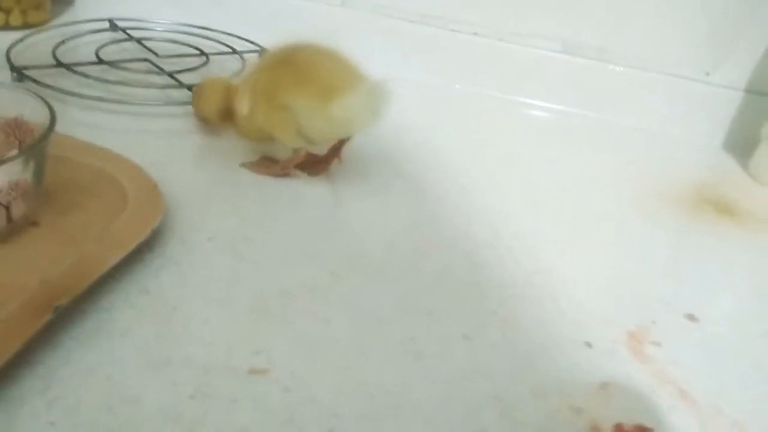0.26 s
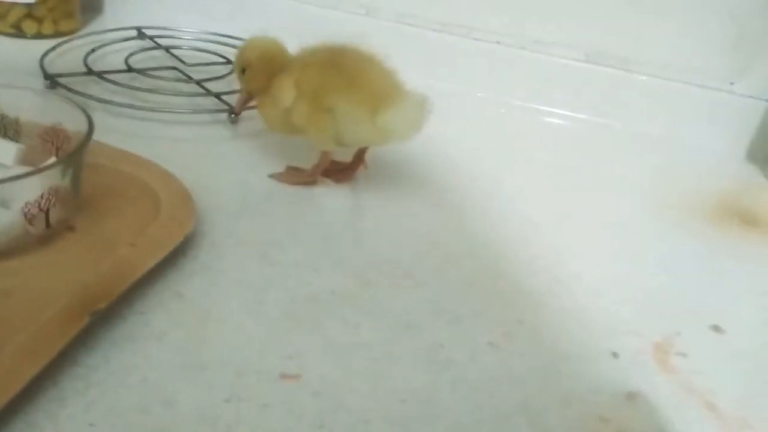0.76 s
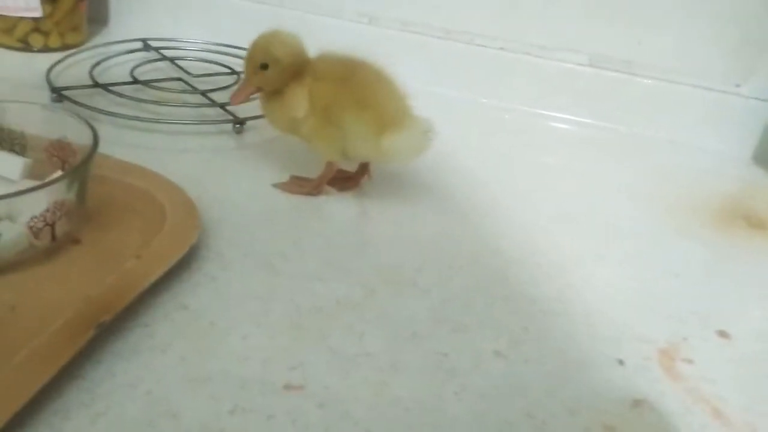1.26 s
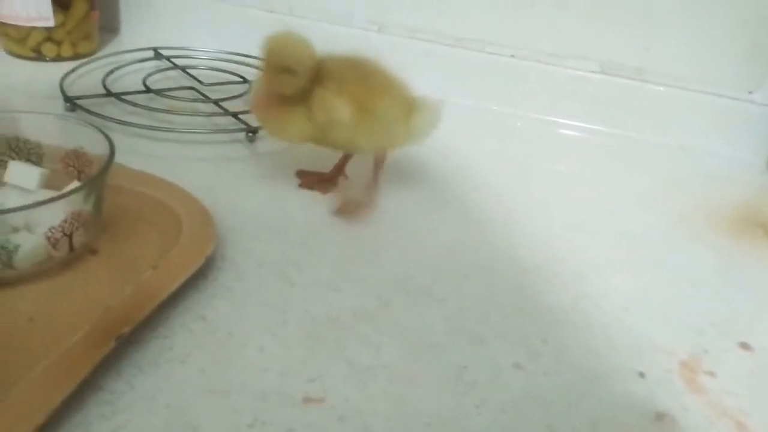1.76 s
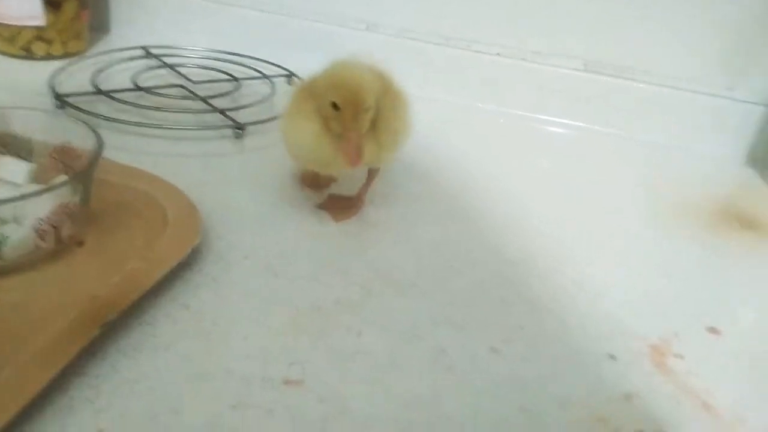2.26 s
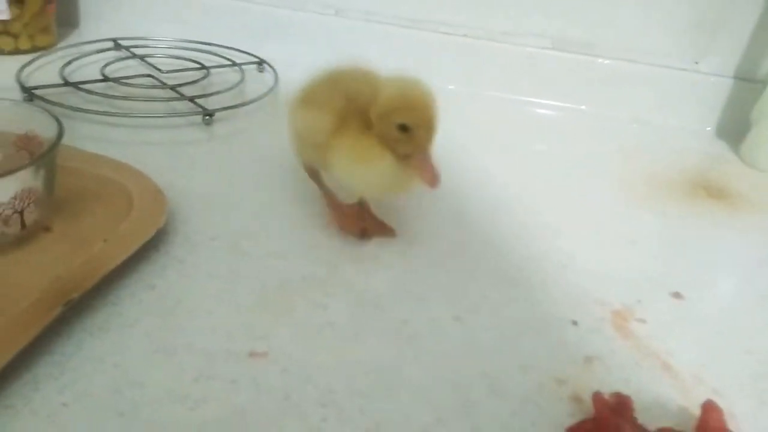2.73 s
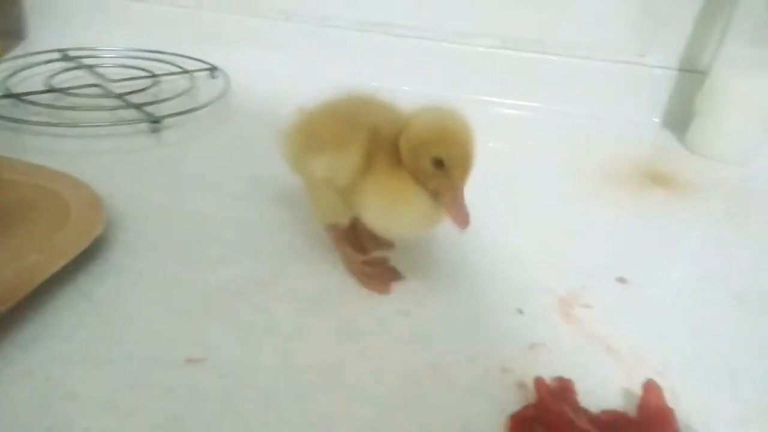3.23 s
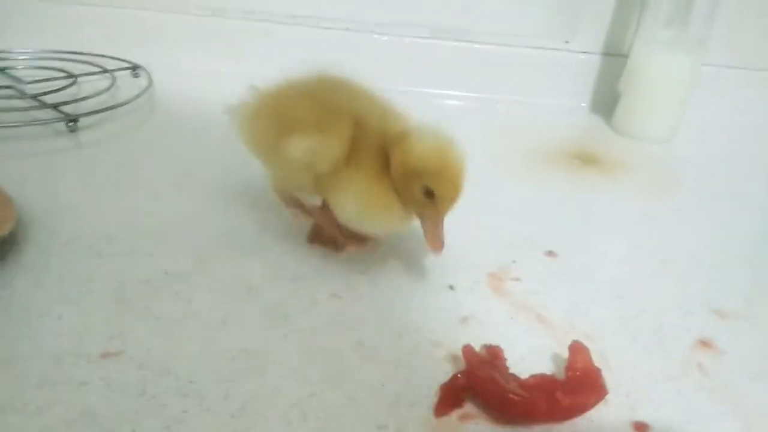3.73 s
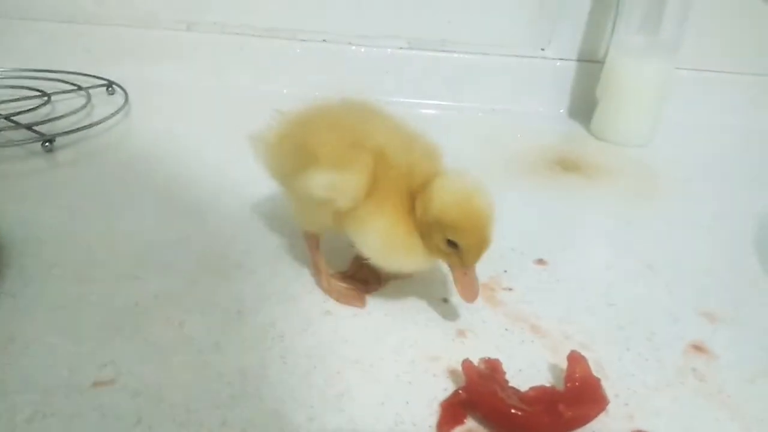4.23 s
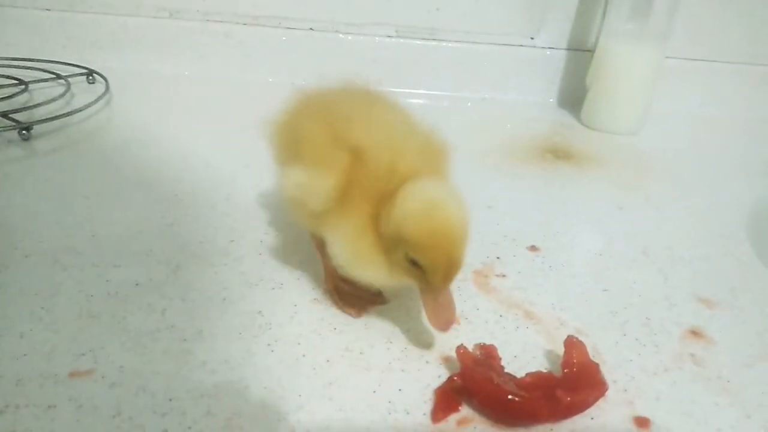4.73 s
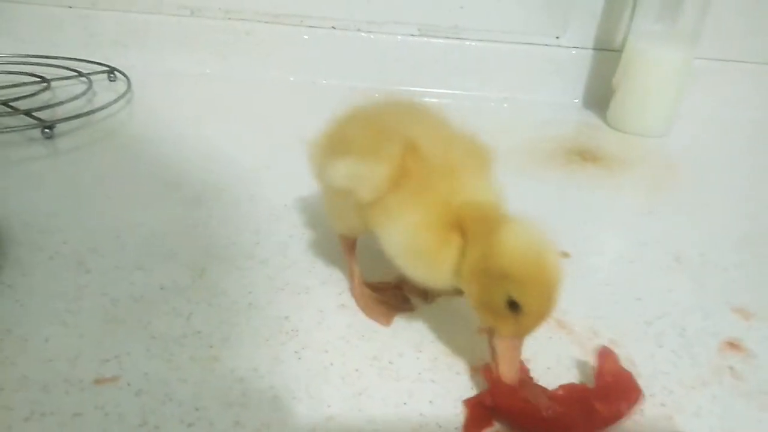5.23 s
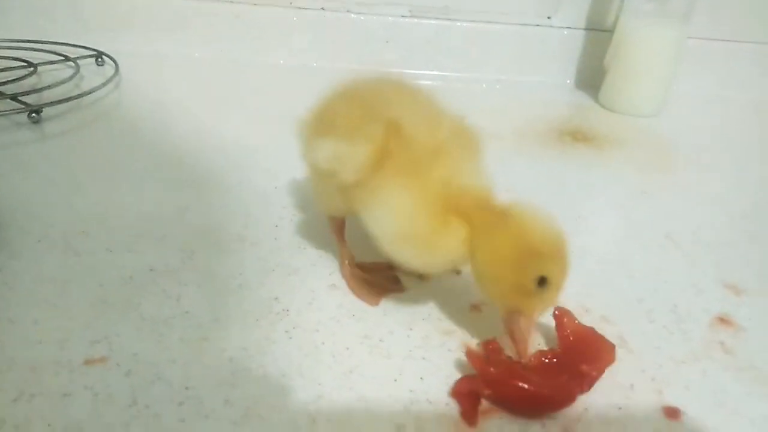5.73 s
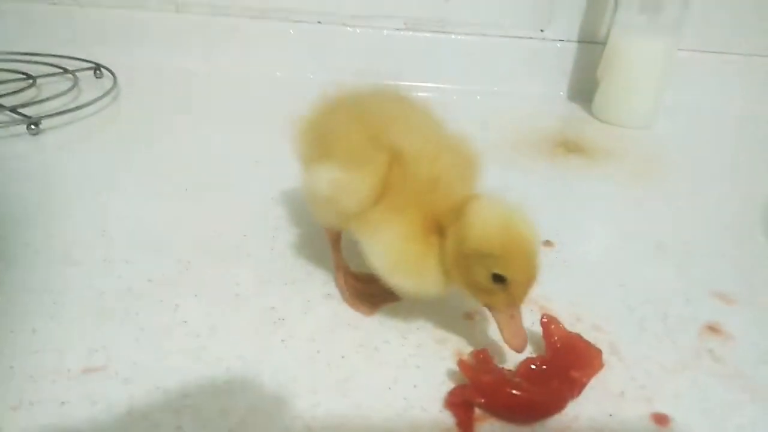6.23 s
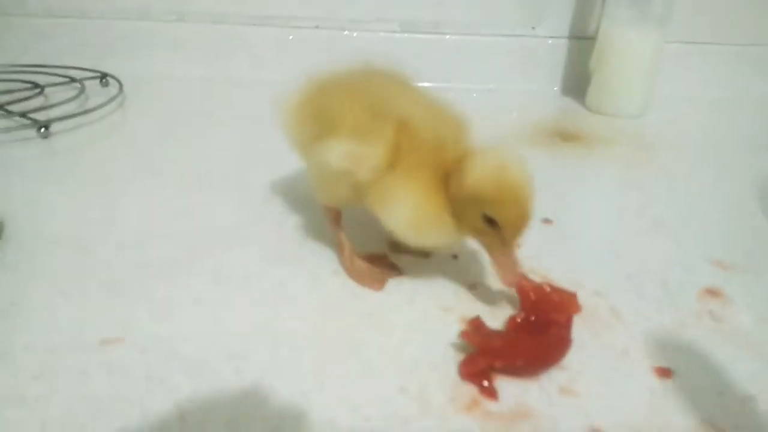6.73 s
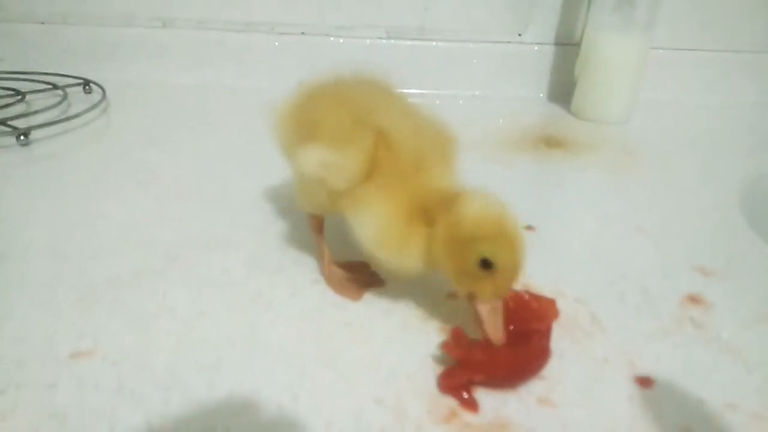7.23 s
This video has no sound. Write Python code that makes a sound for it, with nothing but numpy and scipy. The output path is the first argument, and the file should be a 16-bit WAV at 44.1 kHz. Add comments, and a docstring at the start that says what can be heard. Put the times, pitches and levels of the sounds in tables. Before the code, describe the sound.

Regular hard taps ring a kitchen counter over a low appliance hum as a duckling peeps closer and louder, ending with rubbing handling noise.

```python
"""Even taps on a kitchen counter come first, over an appliance's hum: each thud rings through the slab as a sum of
decaying modes, and its click follows through the air. A duckling peeps as it walks close to a hand-held phone: gliding,
nearly pure tones that fray when pushed, with moving bounces off hard surfaces and the echo of the small tiled room.
Its feet bump softly on the slab; at the end a finger slides over the left microphone as grainy noise and pressure bumps.
"""
import sys
import numpy as np
from scipy import signal
from scipy.fft import rfft, irfft
from scipy.io import wavfile
from scipy.ndimage import uniform_filter1d, map_coordinates

SR = 44100
rng = np.random.default_rng(int(sys.argv[2]) if len(sys.argv) > 2 else 0)


def to_wav(s):
    """Save 16-bit WAV."""
    ch = np.atleast_2d(s).T  # columns
    pcm = np.round(np.clip(ch, -1, 1) * 32767)  # PCM
    wavfile.write(sys.argv[1], SR, pcm.astype(np.int16))


N = 329868
T = np.arange(N) / SR


def amp(db):
    """Decibels to gain."""
    return 10 ** (np.asarray(db) / 20)


def unit(x):
    """Scale to an rms of one."""
    return x / np.sqrt(np.mean(x ** 2))


def lookup(hz, points):
    """Read (f/Hz, value) points on a log-frequency axis."""
    f, value = np.transpose(points)
    return np.interp(np.log(np.maximum(hz, 1)), np.log(f), value)


def colour(x, points):
    """Filter by a (f/Hz, level/dB) spectrum."""
    n = x.shape[-1]
    gain = amp(lookup(np.fft.rfftfreq(n, 1 / SR), points))
    return irfft(rfft(x) * gain, n)


def band(x, lo_hz, hi_hz):
    """Causal band-pass."""
    edges = [lo_hz, min(hi_hz, SR / 2 - 100)]
    return signal.sosfilt(signal.butter(2, edges, "band", fs=SR, output="sos"), x)


def walk(rate, n=N):
    """Random wander with a spread near one: straight lines between `rate` random knots per second."""
    knots = rng.standard_normal(4096)
    return map_coordinates(knots, [np.arange(n) * rate / SR], order=1, mode="wrap")


def add(out, start_s, x):
    """Mix a sound in at a time."""
    i = int(start_s * SR)
    out[..., i:i + x.shape[-1]] += x[..., :N - i]


def delay(x, lag_s):
    """Delay by a steady or slowly moving time."""
    return map_coordinates(x, [(T - lag_s) * SR], order=3)


def pan(x, left_db):
    """Move a sound between the two microphones; left_db is left minus right."""
    return x * amp(np.array([left_db, -left_db]) / 2)


# the room at rest, relative spectrum: (f/Hz, level/dB)
ROOM_SPECTRUM = [(20, -12), (30, -4.5), (48, -5), (65, -13.5), (80, -10.5), (135, -11), (167, -19.5),
                 (271, -20), (475, -28.5), (620, -29.5), (780, -38), (1000, -46), (3000, -46.5),
                 (12000, -54), (15000, -72)]
# the appliance's drone, bands of noise: (centre f/Hz, width f/Hz, level/dB)
HUM_BANDS = [(49.6, 15, -76.5), (277.1, 19.8, -71.5)]
ROOM_DB = -62  # the part common to both microphones


def room_tone(side_db=-7, waver_db=1):
    """Soft rumble and a wavering appliance hum; the hiss above is unrelated left and right."""
    mid = unit(colour(rng.standard_normal(N), ROOM_SPECTRUM))
    side = unit(colour(rng.standard_normal(N), ROOM_SPECTRUM))
    # the bass is nearly shared; as strong as mid, the side sets left and right apart
    side = colour(side, [(300, side_db), (1500, 0.0059)])
    hum = np.zeros(N)
    for hz, width, db in HUM_BANDS:
        # noise in a narrow band swells and sinks of itself
        hum += amp(db) * unit(band(rng.standard_normal(N), hz - width / 2, hz + width / 2))
    level = amp(ROOM_DB + waver_db * walk(3.6))
    return level * np.array([mid + side, mid - side]) + hum


# the kitchen's decay: (f/Hz, t60/s)
KITCHEN_DECAY = [(300, 0.31), (1100, 0.21), (3200, 0.21), (7000, 0.068), (14000, 0.017)]


def kitchen(x):
    """Diffuse echo of the tiled room, different at each microphone; the treble dies first."""
    t = np.arange(SR // 2) / SR
    tail = np.zeros((2, len(t)))
    for hz in 125 * 2. ** np.arange(8):  # octave bands
        noise = band(rng.standard_normal((2, len(t))), hz / np.sqrt(2), hz * np.sqrt(2))
        tail += noise * 1000 ** (-t / lookup(hz, KITCHEN_DECAY))
    tail = tail * np.clip(t / 0.0017, 0, 1)
    unit_energy_tail = unit(tail) / np.sqrt(len(t))
    return signal.fftconvolve(x[None], unit_energy_tail, axes=1)[:, :N]


# counter and cabinet modes: (f/Hz, relative level/dB, t60/s)
SLAB_MODES = [(57, -16.5, 1), (93.4, -16.5, 0.39), (102.6, -13.5, 0.6), (120.24, -9.5, 0.39),
              (158, -16.5, 0.12), (314.5, -6.5, 0.097), (332, -13.5, 0.24), (402.8, -19.5, 0.38),
              (432.2, -11, 0.16), (430, -38, 0.48), (579.4, -17.5, 0.16), (628, -33, 0.6), (736, -24, 0.23)]


def slab(db, scatter_db=2, contact_s=0.00076):
    """One soft-edged blow on the counter; each lands on a new spot and weights the modes anew."""
    t = np.arange(SR // 2) / SR
    hz, mode_db, t60 = np.transpose(SLAB_MODES)[:, :, None]
    scatter, detune = rng.standard_normal((2, len(SLAB_MODES), 1))
    tones = np.sin(2 * np.pi * hz * (1 + 0.015 * detune) * t)
    ring = amp(mode_db + scatter_db * scatter) * tones * 1000 ** (-t / t60)
    soft_edge = 1 - np.exp(-(t / contact_s) ** 2)
    return amp(db) * ring.sum(0) * soft_edge


# soft bumps on the counter while it waddles: (t/s, relative level/dB)
FOOTFALLS = [(3.836, -60), (4.011, -57), (4.066, -59), (4.49, -61)]


def steps():
    """Webbed feet stir the slab's modes without any click."""
    pats = np.zeros(N)
    for start, db in FOOTFALLS:
        add(pats, start, slab(db))
    return pats


# taps on the counter: (t/s, relative thud level/dB, relative click level/dB)
COUNTER_TAPS = [(0.0468, -33, -60), (0.2232, -31.5, -56.5), (0.3971, -34, -62), (0.567, -34, -60),
                (0.729, -32, -56), (0.9049, -32, -56.5), (1.0788, -31, -55), (1.2452, -33.5, -57),
                (1.4179, -35, -62), (1.588, -33.5, -58.5), (1.7532, -35.5, -61), (1.9325, -33.5, -56.5),
                (2.1054, -39, -62.5), (2.2753, -46, -82), (2.4435, -31.5, -52.5), (2.6165, -31.5, -53)]
# the click's colour: (f/Hz, level/dB)
CLICK_COLOUR = [(200, 13.5), (600, -1), (1300, 4.5), (2000, -2), (3200, -5), (5200, -5), (8000, -15.5),
                (12000, -25.5), (16000, -17)]
# the blow's boom in the air: (f/Hz, relative level/dB)
BOOM_COLOUR = [(200, -7), (330, 3), (450, 2.5), (600, -8.5), (800, -11), (1400, -19), (2500, -49.5)]
AIR_LAG_S = 0.0062  # how far the air sound trails the slab


def taps(click_db=32, grit_db=-25, grit_s=0.0032, room_db=-2, boom_db=-14, boom_t60=0.21, slab_db=-1):
    """A blow rings the slab at once; its sharp contact noise and boom come later by air and fill the room."""
    thuds, clicks, booms = np.zeros(N), np.zeros(N), np.zeros((2, N))
    t = np.arange(SR // 2) / SR
    for start, thud_db, tick_db in COUNTER_TAPS:
        add(thuds, start, slab(thud_db + slab_db))
        impulse = band(1. * (t == 0), 140, 12000)
        grit = rng.standard_normal(len(t)) * amp(6.0 * walk(1200, len(t))) * np.exp(-t / grit_s)
        add(clicks, start + AIR_LAG_S, amp(tick_db + click_db) * (impulse + amp(grit_db) * grit))
        boom = unit(colour(rng.standard_normal((2, len(t))), BOOM_COLOUR))
        boom = boom * 1000 ** (-t / boom_t60) * np.clip(t / 0.0028, 0, 1)
        add(booms, start + AIR_LAG_S, amp(thud_db + boom_db) * boom)
    clicks = colour(clicks, CLICK_COLOUR)
    # the blows land to the left, so the right microphone hears them a little later
    direct = np.array([thuds + clicks, delay(thuds + clicks, .0001)])
    return direct + booms + amp(room_db) * kitchen(clicks)


def stroke(start, gather_s, fade_s):
    """The finger's speed: it gathers, then slows to rest."""
    corners = [start, start + gather_s, start + gather_s + fade_s]
    return np.sin(np.pi / 2 * np.interp(T, corners, [0, 1, 0]))


# the finger seals and frees the port: (t/s, width/s, pressure, full scale 1)
PORT_BUMPS = [(7.215, 0.006, 0.046), (7.256, 0.0034, -0.031), (7.281, 0.003, .035),
              (7.315, 0.00082, -0.083), (7.341, 0.0014, 0.091), (7.385, 0.036, 0.018)]
# strokes over the port: (start t/s, swell/s, fade/s, pressure rumble level/dB, scrape level/dB, skin hiss level/dB)
FINGER_STROKES = [(6.74, 0.08, 0.6, -57, -94, -56.5), (6.88, 0.087, 0.12, -49, -48, -39.5),
                  (7.116, 0.12, 0.059, -32.5, -36.5, -45), (7.299, 0.051, 0.054, -35.5, -42.5, -55.5)]
# colours of the rubbing, each: (f/Hz, relative level/dB)
RUMBLE_COLOUR = [(20, 11), (50, 1), (110, -4), (250, -11.5), (600, -20.5), (1500, -39.5)]
SCRAPE_COLOUR = [(150, -4), (600, -3), (1900, -4), (3000, -5), (5000, -11), (8000, -23), (15000, -39)]
HISS_COLOUR = [(1500, -25), (4200, -3.5), (6000, -6.5), (8500, -10), (12000, -7), (15500, -1)]
# how sharply each part of the rubbing follows the finger's speed (exponents)
RUMBLE_POWER, SCRAPE_POWER, HISS_POWER = 0.55, 1.72, 3
SNAPS_PER_S = 70


def finger(grain_db=2.0, slip_db=2, snap_db=6, leak_db=-22):
    """Skin catches and slips on the left port: dense grains hiss and scrape, trapped air rumbles and bumps."""
    rub = np.zeros(N)
    for at, width, pressure in PORT_BUMPS:
        rub += pressure * np.exp(-.5 * ((T - at) / width) ** 2)
    catches = amp(grain_db * walk(1100) + slip_db * walk(90))
    snaps = amp(snap_db) * (rng.random(N) < SNAPS_PER_S / SR) * rng.exponential(size=N)
    parts = [unit(colour(rng.standard_normal(N) * catches + snaps, points))
             for points in (RUMBLE_COLOUR, SCRAPE_COLOUR, HISS_COLOUR)]
    powers = (RUMBLE_POWER, SCRAPE_POWER, HISS_POWER)
    for start, gather_s, fade_s, *levels in FINGER_STROKES:
        speed = stroke(start, gather_s, fade_s)
        for part, db, power in zip(parts, levels, powers):
            rub += part * amp(db) * speed ** power
    # only a little reaches the other microphone through the case
    return np.array([rub, amp(leak_db) * band(rub, 300, 14500)])


# the rasp's colour: (f/Hz, relative level/dB)
RASP_COLOUR = [(500, 0.5), (1200, -2.5), (2000, -5), (4200, -5.5), (5500, -6), (7000, -8), (9000, -13),
               (15000, -14)]
OVERTONE_DB, RASP_DB = -26.5, -26
# the octave stands out more in softer calls: (dB per dB below full voice, level of full voice dB)
OVERTONE_SLOPE, FULL_VOICE_DB = 0.73, -44.5


def syrinx(hz, size, rough, jitter=0.0098, flutter_db=2, shake=0.49, shake_rate=1800, rasp_power=0.14):
    """A nearly pure whistle with a weak octave; when pushed, the membranes shake and fray the line."""
    n = len(hz)
    phase = 2 * np.pi * np.cumsum(hz * (1 + jitter * walk(523, n))) / SR
    phase = phase + shake * rough * walk(shake_rate, n)
    octave_db = OVERTONE_DB + OVERTONE_SLOPE * (FULL_VOICE_DB - 20 * np.log10(size.max()))
    flutter = amp(flutter_db * walk(224.3, n)) * (1 + shake * rough * walk(shake_rate, n))
    tone = flutter * (np.sin(phase) + amp(octave_db) * np.sin(2 * phase))
    # a faint hiss stays around the tone even where it is weak
    flow = size.max() * (size / size.max()) ** rasp_power
    rasp = unit(colour(rng.standard_normal(n), RASP_COLOUR)) * flow * (1 + rough)
    return size * tone + amp(RASP_DB) * rasp


CALL_ATTACK_S, CALL_RELEASE_S = 0.0079, 0.01


def swell(t):
    """Attack and release of any call, as straight ramps."""
    return np.clip(t / CALL_ATTACK_S, 0, 1) * np.clip((t[-1] - t) / CALL_RELEASE_S, 0, 1)


# a peep climbs from the slack pitch to its top, then sags for as long as it lasts
SLACK_HZ, SAG_HZ_PER_S, DROOP_DB = 2341, 29200, 6.5


def peep(rise, fall, top_hz, db, rough):
    """Air pressure swells and sinks: the pitch arches, and the top of the arch is loudest and roughest."""
    t = np.arange(int((rise + fall) * SR)) / SR
    slack = np.where(t < rise, 1 - t / rise, (t - rise) / fall) ** 2
    depth_hz = np.where(t < rise, top_hz - SLACK_HZ, SAG_HZ_PER_S * fall)
    hz = top_hz - slack * depth_hz
    return syrinx(hz, amp(db - DROOP_DB * slack) * swell(t), rough * (1 - slack) ** 2)


# a whistle frays briefly at its first crest, the more the further it has climbed
CREST_S, FRAY_S, FRAY_PER_HZ = 0.047, 0.026, .00022


def whistle(curve):
    """A peep that is held on: rough at the first crest, then clean."""
    s, pitch, level = np.transpose(curve)
    t = np.arange(s[0], s[-1], 1 / SR)
    hz = uniform_filter1d(np.interp(t, s, pitch), size=400)
    crest = np.exp(-((t - s[0] - CREST_S) / FRAY_S) ** 2)
    rough = FRAY_PER_HZ * np.maximum(hz - hz[0], 0) * crest
    # t counts from the start of the scene here, so only the release ramp of the swell acts
    return syrinx(hz, amp(np.interp(t, s, level)) * swell(t), rough)


# short peeps: (start t/s, rise/s, fall/s, top f/Hz, relative level/dB, roughness 0-1)
SHORT_PEEPS = [(.11, .022, .019, 2920, -55, 0.37), (.742, 0.016, 0.026, 3220, -49.5, 0.14),
               (.921, .017, 0.025, 2560, -64.5, 0.3), (1.346, 0.027, 0.03, 3284, -53, 0.7),
               (1.511, .025, 0.026, 3315, -53, 0.7), (1.675, 0.0256, 0.026, 3120, -52.5, 0.53),
               (1.934, 0.023, 0.029, 3416, -51, 0.4), (2.097, .025, 0.024, 3490, -48.5, 0.44),
               (2.394, 0.03, .019, 3500, -49.5, 0.54), (2.558, 0.027, 0.024, 3560, -45, 0.46),
               (2.841, 0.017, 0.018, 3580, -43.5, 0.36), (3.006, 0.025, 0.027, 3728, -43.5, 0.56),
               (3.188, 0.02, 0.013, 3080, -51.5, 0.4), (3.777, 0.02, 0.022, 3545, -47, 0.77),
               (4.486, 0.019, 0.021, 3590, -49, 0.75), (4.863, .032, .023, 3590, -45.5, 0.43),
               (5.038, 0.031, 0.035, 3634, -43, 0.5), (5.201, 0.033, 0.02, 3574, -44.5, .35),
               (5.674, .03, 0.042, 3460, -43, 0.16), (5.96, 0.029, 0.023, 3570, -42.5, 0.3),
               (6.658, 0.027, 0.034, 3173, -43.5, 0.1), (6.98, 0.028, 0.023, 3220, -42.5, 0.3),
               (7.175, 0.015, 0.0225, 2810, -40.5, 0)]
# drawn-out whistles, one curve each: (t/s, f/Hz, relative level/dB)
LONG_WHISTLES = [
    [(3.506, 2290, -72), (3.529, 3510, -42.5), (3.546, 3580, -42), (3.56, 3130, -57), (3.585, 2940, -59),
     (3.618, 3370, -50), (3.627, 3560, -41), (3.669, 3427, -41.5), (3.684, 3340, -61)],
    [(4.199, 2240, -54), (4.208, 3040, -55), (4.23, 3560, -42.5), (4.245, 3410, -53), (4.256, 3010, -53.5),
     (4.292, 2880, -51.5), (4.32, 3120, -49), (4.338, 3300, -64), (4.362, 3460, -52), (4.402, 3486, -60.5),
     (4.422, 2800, -50)],
    [(5.81, 3170, -50), (5.846, 3515, -43.5), (5.872, 3220, -43.5), (5.894, 3060, -47)],
]
# the walk from the tiled back wall: (t/s, strength of the bounces level/dB, left minus right level/dB)
WALK_PATH = [(1.6, 7, -4.5), (2.0, 6, -8.5), (2.9, 4, -2.5), (3.7, 0, -4), (5.0, 2, -2.7)]
# hard surfaces near the duckling: (delay t/s, level/dB before the walk's bounce strength)
NEAR_BOUNCES = [(.0009, -13), (.0024, -13), (.0047, -15), (.0085, -19)]


def duckling(echo_db=-20):
    """Peeps and whistles on the move; counter and wall throw them back."""
    voice = np.zeros(N)
    for start, *shape in SHORT_PEEPS:
        add(voice, start, peep(*shape))
    for curve in LONG_WHISTLES:
        add(voice, curve[0][0], whistle(curve))
    s, wall_db, left_db = np.transpose(WALK_PATH)
    wall = amp(np.interp(T, s, wall_db))
    heard = []
    for side in pan(voice, np.interp(T, s, left_db)):
        # the paths change as it walks, so the echoes beat differently against each glide;
        # each microphone has its own paths
        bounces = sum(amp(db) * delay(side, lag + 0.0002726 * walk(2)) for lag, db in NEAR_BOUNCES)
        heard.append(side + wall * bounces)
    left, right = heard
    near = np.array([delay(left, .00006), right])  # it stands nearer the right microphone
    return near + amp(echo_db) * kitchen(voice)


def scene():
    """Everything in the kitchen."""
    return room_tone() + steps() + taps() + finger() + duckling()


TOP_HZ = 15700


def record(dry):
    """The phone cuts the top with a steep low-pass."""
    return signal.sosfilt(signal.ellip(10, .2, 70, TOP_HZ, fs=SR, output="sos"), dry)


dry = scene()
out = record(dry)
to_wav(out)
```